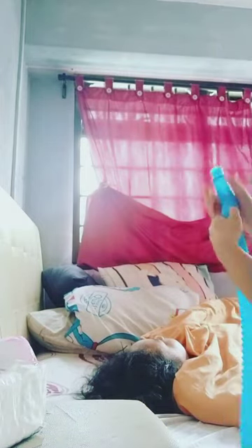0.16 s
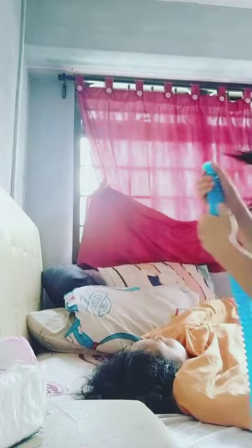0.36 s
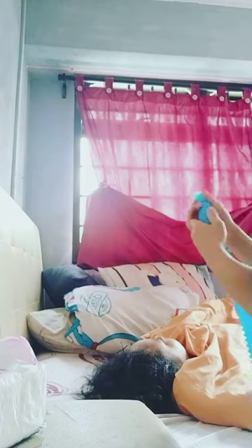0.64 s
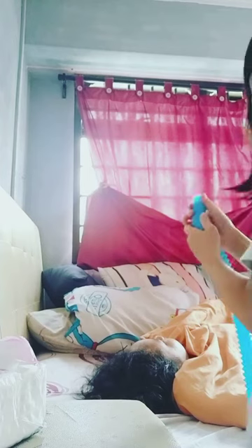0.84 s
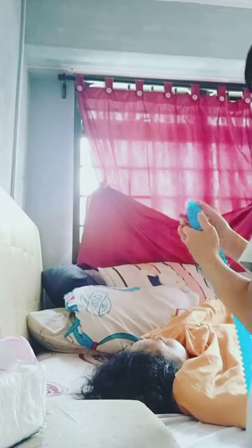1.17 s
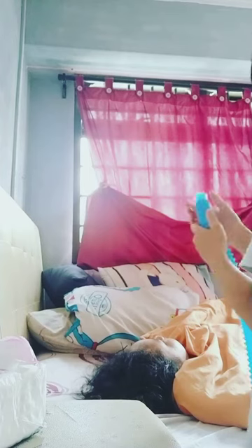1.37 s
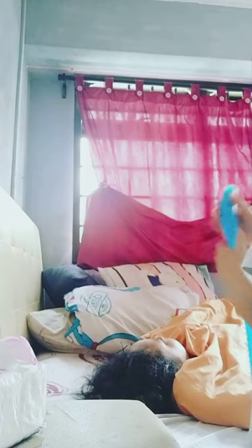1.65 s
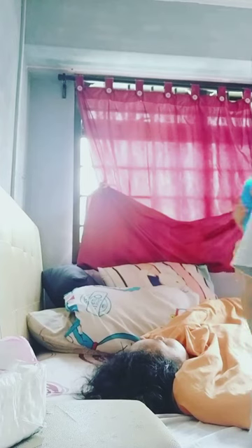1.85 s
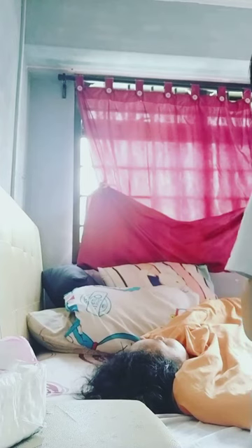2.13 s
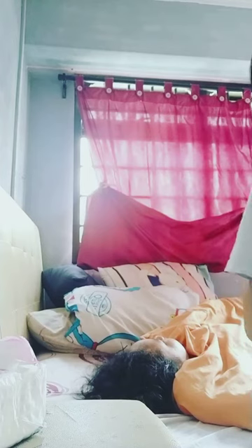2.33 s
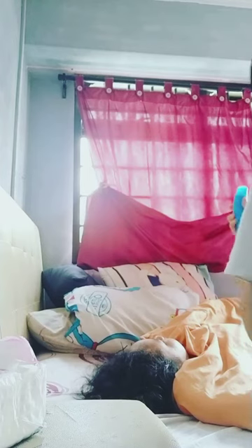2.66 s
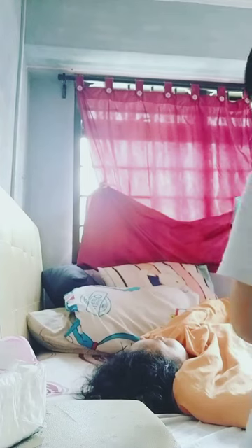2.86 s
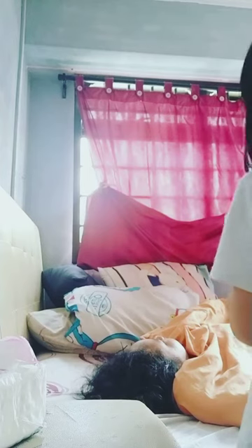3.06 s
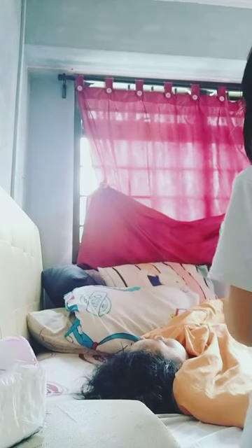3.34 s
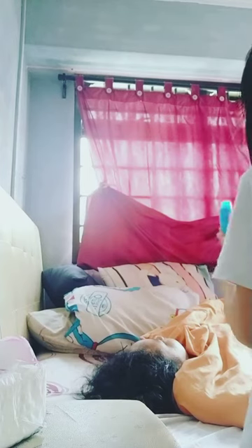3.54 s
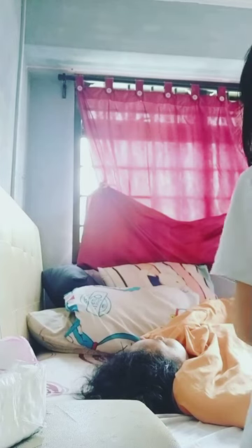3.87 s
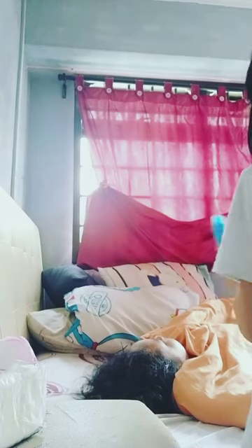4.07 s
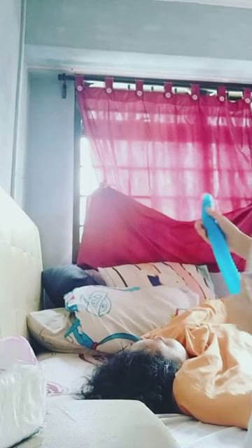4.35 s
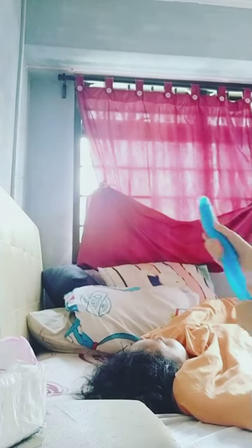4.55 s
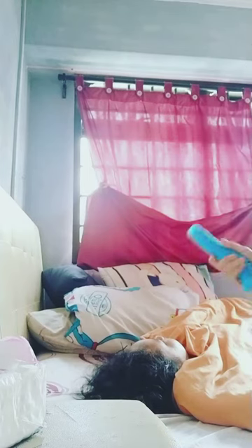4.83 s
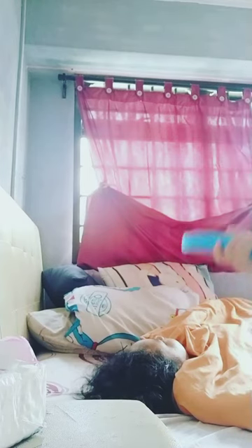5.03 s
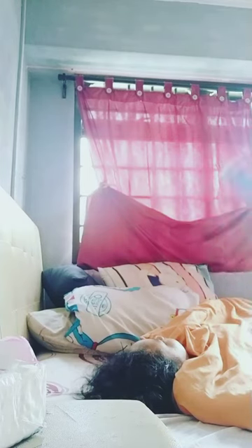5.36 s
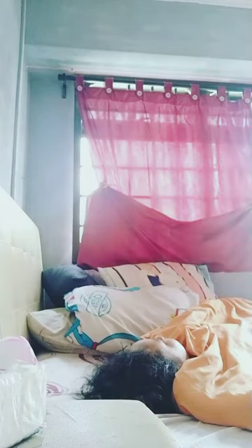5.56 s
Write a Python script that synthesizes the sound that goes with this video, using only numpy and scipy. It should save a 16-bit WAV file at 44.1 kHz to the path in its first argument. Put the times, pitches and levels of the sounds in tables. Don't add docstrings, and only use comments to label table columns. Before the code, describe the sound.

Corrugated plastic pops and crackles in short handfuls, its hollow ring climbing in pitch, with faint finger rubbing between bursts and soft room hush.

```python
import sys
import numpy as np
from scipy import signal
from scipy.fft import rfft, irfft, next_fast_len
from scipy.io import wavfile
from scipy.ndimage import uniform_filter1d

SR = 44100
rng = np.random.default_rng(int(sys.argv[2]) if len(sys.argv) > 2 else 0)


def linear_from_db(decibels):
    return 10 ** (np.asarray(decibels, float) / 20)


def dump(signal):
    limited = np.clip(np.atleast_2d(signal).T, -1, 1)
    pcm = np.round(limited * 32767).astype(np.int16)
    wavfile.write(sys.argv[1], SR, pcm)


N = 251370

# time in seconds, stir level in dB.
STIR = [(0, -64), (.76, -64), (.98, -72), (1.85, -71.5), (2.36, -63.5), (3.92, -61), (4.1, -65), (4.7, -59),
        (5.7, -65)]
# frequency in Hz, density in dB per Hz.
RUMBLE_SPECTRUM = [(12, -60), (20, -32), (41, -10.5), (59, -7), (110, -9.5), (178, -16.5), (250, -31),
                   (320, -78.5), (550, -120)]
TONE_SPECTRUM = [(120, -65.5), (200, -19.5), (307, -15.5), (430, -11), (704, -11.5), (774, -12.5),
                 (880, -8), (1310, -20), (1460, -8), (1890, -21.5), (2860, -19.5), (3810, -58.5),
                 (4190, -29), (8440, -32), (9000, -32.5), (11700, -35), (19800, -120)]
# frequency in Hz, left-right likeness from 0 to 1.
COHERENCE = [(30, .85), (110, 0.8), (290, 0.53), (640, 0.45), (1400, 0), (3000, 0), (9000, 0)]

# middle in seconds, peak in dB, half length in seconds.
SLIDES = [
    (0.188, -71.5, 0.13),
    (1.685, -67, 0.11),
    (2.583, -67, 0.12),
    (3.47, -70, 0.18),
    (4.21, -63.5, 0.03),
    (4.313, -61.5, 0.078),
    (4.456, -65, 0.067),
]
# frequency in Hz, density in dB per Hz.
SKIN_SPECTRUM = [(1180, -35.5), (2000, -18), (3030, -24.5), (3370, -3), (4020, -28.5), (4510, -5.5),
                 (5770, -1.5), (10200, -12.5), (14100, -12.5), (16100, -33), (16500, -86.5)]
# time in seconds, level in dB, frequency in Hz.
TICKS = [
    (0.116, -54, 7600),
    (1.507, -56.5, 3500),
    (4.1989, -50.5, 4460),
    (4.2964, -51, 5940),
]

# start in seconds, then the levels in dB of the
SNAPS_EARLY = [(0.4071, -33.5, -34.5, -21, -30.5), (0.4239, -28, -37.5, -31, -36.5),
               (0.4436, -40.5, -33.5, -22.5, -52), (.578, -8.5, -13.5, -15, -36),
               (.625, -6.5, -18, -19.5, -43.5), (0.6666, -17, -29.5, -27.5, -40),
               (0.763, -15, -29, -33.5, -49.5), (0.8658, -20, -38.5, -29.5, -46),
               (1.9281, -10, -16, -16, -24.5), (2.0622, -14, -31.5, -27, -53),
               (2.0768, -17.5, -33, -21.5, -52), (2.0816, -5.5, -33.5, -44.5, -51),
               (2.1032, -20.5, -26.5, -34, -45.5), (2.1451, -3, -23.5, -26, -39),
               (2.2014, -3, -53.5, -11, -33.5), (2.216, -14, -27, -18.5, -37.5)]
# start in seconds, body, bright, dull and air levels in dB.
SNAPS_MID = [(2.763, -16, -19.5, -13.5, -33.5), (2.773, -10.5, -13, -35.5, -35),
             (2.8854, -15, -42, -25, -26), (2.9167, -4.5, -21.5, -19.5, -52),
             (3.0153, -12.5, -20.5, -64, -56), (3.0796, -1, -42, -23.5, -31.5),
             (3.1114, -6, -45, -17.5, -29.5), (3.5757, -20, -24, -17, -40), (3.5903, -7, -21, -13.5, -18.5),
             (3.6107, -27, -53, -25, -33), (3.732, -25, -37.5, -19, -22.5), (3.7806, -6.5, -17, -18, -30.5),
             (3.8643, -20.5, -34, -35, -38), (3.9257, -8, -30, -19.5, -38), (3.957, -14, -46, -22, -33.5),
             (3.583, -28.5, -24.5, -43, -55.5)]
# start in seconds, body, bright, dull and air levels in dB.
SNAPS_LATE = [(4.584, -11.5, -19, -16.5, -20.5), (4.596, -21.5, -38, -12, -30),
              (4.607, -43, -29.5, -17.5, -20), (4.616, -15.5, -37.5, -6, -15), (4.635, -10, -23, -1, -14.5),
              (4.6303, -49.5, -31.5, -11, -14.5), (4.6893, -71.5, -51, -20, -45),
              (4.7613, -37, -32.5, 0.5, -12.5), (4.8586, -52, -39, -30.5, -25.5),
              (4.8828, -14.5, -31, 4, -8)]
# start in seconds, body, bright, dull and air levels in dB.
SNAPS_LAST = [(5.2569, -22, -37.5, -25.5, -22), (5.2919, -12, -26, -12, -15.5), (5.2993, -2, -19, -23, -24),
              (5.3075, -20, -31, -35, -19), (5.3243, -17, -31, -27.5, -46), (5.342, -12, -29.5, -19, -16),
              (5.3662, -5, -19, -18.5, -24), (5.3917, -18.5, -22.5, -23, -29),
              (5.3958, -5, -22.5, -35, -17.5), (5.435, -23, -24, -22, -22),
              (5.463, -23, -27.5, -28.5, -23.5), (5.5889, -10, -33, -11.5, -13),
              (5.5995, -4.5, -18, -17, -16.5), (5.6197, -20, -38.5, -27, -18),
              (5.6851, -12.5, -52.5, -13.5, -23), (5.6914, -27, -23, -14, -57)]
# start in seconds, body, bright, dull and air levels in dB.
YIELDS = [
    (0.5603, -49.5, -43.5, -36.5, -63.5),
    (1.86, -79.5, -85, -58, -47.5),
    (1.886, -75.5, -75.5, -37.5, -36.5),
    (2.028, -71, -44.5, -57, -37.5),
    (2.758, -37, -49, -31, -20),
    (2.873, -50.5, -79.5, -34, -27),
    (3.54, -95.5, -70, -48, -33.5),
    (2.744, -85, -69, -71, -38),
]
# start in seconds, level in dB, frequency in Hz.
JOLTS = [
    (0.577, -37, 129),
    (.628, -37.5, 121),
    (4.603, -26, 218),
    (4.883, -44.5, 148.5),
    (5.599, -47, 218),
]
# time in seconds, pitch in Hz, t60 of the lowest mode in seconds.
AIR_COLUMN = [(.41, 280, 0.22), (.6, 295, 0.27), (.87, 296, 0.22), (1.93, 307, 0.29), (2.22, 341.2, 0.25),
              (2.77, 352, 0.1), (3.1, 386.6, 0.11), (3.59, 394.4, 0.1), (3.78, 418, 0.074),
              (3.93, 461, .11), (4.59, 451, 0.041), (4.64, 446, 0.052), (4.76, 484.6, 0.07),
              (4.88, 499, .045), (5.27, 526, 0.12), (5.44, 567, 0.056), (5.6, 549, 0.072)]
# time in seconds, strengths in dB of modes 2, 3, 4 and 5.
GRIP_MODES = [(.41, -3, -5.5, 2.5, -11.5), (.7, -18.5, 2.5, 8, 5), (1.93, -2.5, -2, -1.5, -0.5),
              (2.22, -8.5, -7.5, -7.5, -5.5), (2.9, -1.5, -4, 3, 8.5), (3.7, 2.5, -18, 5, 2.5),
              (4.6, 3, -6.5, 8, 1), (4.76, -1, -6.5, 19, 19.5), (4.88, 5.5, -9.5, 18, 17.5),
              (5.3, 14, 5, 9.5, -17), (5.44, 19.5, 19.5, -1, 23.5), (5.6, 6, 3, -6, -3)]
# time in seconds, body click in Hz, bright click in Hz,
# top edge of the bright click in dB.
FACE = [(.44, 2850, 6130, -3.5), (.6, 2740, 4980, -16), (1.93, 2870, 5905, -12.5), (2.1, 3090, 5794, -8.5),
        (2.2, 2880, 5000, -15.5), (2.78, 2420, 6540, -9), (2.92, 3510, 4950, -17.5),
        (3.03, 3830, 5920, -15), (3.11, 3024, 5200, -4.5), (3.58, 3280, 4810, -7.5), (3.8, 3530, 4710, -17),
        (3.93, 2640, 4730, -12), (4.6, 3330, 4810, -5), (4.76, 2450, 6060, -0.5), (5.3, 2240, 6250, -12.5),
        (5.6, 2480, 6150, -7.5)]
# frequency in Hz, width in Hz, level in dB.
DULL_WALL = [(1226, 440, 3.5), (2280, 120, -2)]
# frequency in Hz, gain in dB.
SNAP_COLOUR = [(50, -17.5), (230, -4.5), (8300, -1), (10000, -2), (11300, -3.5), (12600, -5),
               (14000, -13.5), (15500, -11)]

# time in seconds, left-right difference in dB, room share in dB,
# lag of the left port in seconds, height over the bed in metres.
HANDS = [(.42, 6, 1.5, .00011, .21), (.8, 7.5, 0.05, 0.00008, .2), (2.1, 9, 1.9, 0.000085, .27),
         (2.9, 7, 2.5, 0.000031, .26), (3.04, 1, 1, 0.000017, 0.27), (3.6, 4.5, 1, 0.000037, .24),
         (3.95, 3.5, 1, 0.000025, .24), (4.6, 3, -1.5, .00003, .23), (4.76, 3.5, -9, 0.000031, .13),
         (4.88, 5.5, -7.5, 0.000043, .14), (5.4, 5, -5.5, 0.000069, .22), (5.6, 6, -2, 0.000037, .25)]
# left delay in seconds, right delay in seconds, level in dB.
ECHOES = [
    (.0035, .0033, -11),
    (.0086, .0088, -12),
]
# frequency in Hz, t60 in seconds.
REVERBERATION = [(200, 0.095), (530, 0.29), (1400, 0.25), (3700, 0.28), (9700, 0.27)]
# frequency in Hz, room share in dB.
ROOM_COLOUR = [(250, 0), (700, -2), (2000, 2), (4000, -3), (7000, -1.5), (10000, -15.5), (14000, -4)]
# frequency in Hz, left-right difference in dB.
PORTS = [(60, -14), (110, -14.5), (200, -6), (400, -6), (1300, -4), (2400, -0.5), (4400, 0), (8100, -2),
         (15000, 6.5)]


def at(rows, s):
    times, *columns = np.transpose(rows)
    return [np.interp(s, times, column) for column in columns]


def along(points, hz):
    f, v = np.transpose(points)
    return np.interp(np.log(hz + 1), np.log(f + 1), v)


def unit(x):
    return x / np.sqrt(np.mean(x ** 2) + 1e-20)


def filtered(x, response):
    n = x.shape[-1]
    m = next_fast_len(n + 8192)
    spectrum = rfft(x, m) * response(np.fft.rfftfreq(m, 1 / SR))
    return irfft(spectrum, m)[..., :n]


def add(track, s, x):
    part = track[:, round(s * SR):][:, :x.shape[1]]
    part += x[:, :part.shape[1]]


def diffuse(pair, gain):
    def turn(hz):
        return np.arccos(np.clip(along(COHERENCE, hz), -1, 1)) / 2

    mid, side = filtered(pair, lambda hz: gain(hz) * [np.cos(turn(hz)), np.sin(turn(hz))])
    return np.array([mid + side, mid - side])


def hush(spectrum, patchy_db):
    z = signal.stft(rng.standard_normal((2, N + SR)), nperseg=512)[2]
    patches = uniform_filter1d(rng.standard_normal(z.shape[1:]), size=5, axis=0)
    patches = uniform_filter1d(patches, size=10, axis=1)
    pair = signal.istft(z * linear_from_db(patchy_db * unit(patches)), nperseg=512)[1][:, :N]
    return unit(diffuse(pair, lambda hz: linear_from_db(along(spectrum, hz))))


def room_floor():
    stir_db, = at(STIR, np.arange(N) / SR)
    tone_db = -66 + (stir_db + 64)
    rumble = linear_from_db(stir_db - 0.5) * hush(RUMBLE_SPECTRUM, patchy_db=3.0)
    tone = linear_from_db(tone_db + 2.5) * hush(TONE_SPECTRUM, patchy_db=2.0)
    return rumble + tone


def fingers():
    time = np.arange(N) / SR
    edge_drop_db = 18.5
    level = sum(linear_from_db(db - edge_drop_db * ((time - s) / half) ** 2) for s, db, half in SLIDES)
    out = level * hush(SKIN_SPECTRUM, patchy_db=5.0) * linear_from_db(8.0)
    for s, db, hz in TICKS:
        tick = click([(hz, 200, 0), (12500, 800, -12)], time[:2000], burst_s=0.000099)
        add(out, s, placed(linear_from_db(db) * tick, s))
    return out


def resonances(modes):
    def response(f):
        return sum(linear_from_db(db) * 1j * f * w / (c * c - f * f + 1j * f * w) for c, w, db in modes)

    return response


def click(modes, t, burst_s):
    rough = rng.standard_normal(len(t)) * np.exp(-t / burst_s)
    kick = (t == 0) + .26 * rough
    around = filtered(kick, resonances(modes))
    front = filtered(around, resonances(modes))
    around_matched = around * np.linalg.norm(front) / np.linalg.norm(around)
    return np.array([front, around_matched]) / np.abs(front).max()


def placed(x, s):
    front, around = x
    pan_db, wet_db, late, height = at(HANDS, s)
    bed = 2 * height / 343
    bed_echo = (bed, bed + .0001, -6)

    def lag(left, right, f):
        return np.exp(-2j * np.pi * f * np.array([[left + late], [right]]))

    def paths(f):
        echoes = sum(linear_from_db(db) * lag(left, right, f) for left, right, db in [bed_echo] + ECHOES)
        return lag(0, 0, f) + echoes

    wet = linear_from_db(wet_db) * room(around)
    near = filtered(np.pad(front, (0, wet.shape[1] - len(front))), paths)
    return near * linear_from_db([[pan_db / 2], [-pan_db / 2]]) + wet


def room(x):
    hz, t, z = signal.stft(rng.standard_normal((2, SR // 3)), SR, nperseg=256)
    decay = linear_from_db(-60 * t / along(REVERBERATION, hz)[:, None])
    tail = signal.istft(z * decay, SR, nperseg=256)[1]
    wall_s = .0065
    rise = .25 + .75 * np.clip((np.arange(tail.shape[1]) / SR - wall_s) / .002, 0, 1)
    tail = diffuse(rise * tail / np.linalg.norm(tail[0]), lambda f: linear_from_db(along(ROOM_COLOUR, f)))
    return signal.fftconvolve(x[None], tail, axes=1)


def air_column(s, t, body_db, dull_db, air_db):
    pitch, ring_s = at(AIR_COLUMN, s)
    k = np.arange(1, 11)[:, None]
    hz = pitch * k * (1 + .005 * rng.standard_normal(k.shape))
    level_db = along([(1300, dull_db - 9), (2600, body_db - 16.0)], hz)
    level_db = level_db + np.take(at(GRIP_MODES, s), np.clip(k - 2, 0, 3))
    level_db += 1.5 * rng.standard_normal(k.shape)
    level_db -= 8 * np.maximum(k - 5, 0)
    level_db[0] = air_db + 4.0
    flutter = 1.8
    drift = flutter * k * np.cumsum(rng.standard_normal(len(t))) / np.sqrt(SR)
    t60 = ring_s / k ** 0.88
    onset = 1 - np.exp(-t / .0009)
    ring = linear_from_db(level_db - 60 * t / t60) * np.sin(2 * np.pi * hz * t + drift) * onset
    return ring.sum(0)


def snap(s, body_db, bright_db, dull_db, air_db):
    t = np.arange(SR // 4) / SR
    body_hz, bright_hz, edge_db = at(FACE, s)
    body = linear_from_db(body_db - 0.5) * click([(body_hz, 1300, 0)], t, burst_s=0.00012)
    bright_modes = [(bright_hz, 2200, 0), (13000, 5000, edge_db)]
    bright = linear_from_db(bright_db + 13.5) * click(bright_modes, t, burst_s=0.00082)
    dull = linear_from_db(dull_db - 6.5) * click(DULL_WALL, t, burst_s=.00045)
    return body + bright + dull + air_column(s, t, body_db, dull_db, air_db)


def tube():
    out = np.zeros((2, N))
    for s, *levels in SNAPS_EARLY + SNAPS_MID + SNAPS_LATE + SNAPS_LAST + YIELDS:
        add(out, s, placed(snap(s, *levels), s))
    t = np.arange(SR // 10) / SR
    for s, db, hz in JOLTS:
        jolt = linear_from_db(db - 3.0 - 60 * t / 0.087) * np.sin(2 * np.pi * hz * t)
        add(out, s, jolt * np.ones((2, 1)))
    return filtered(out, lambda hz: linear_from_db(along(SNAP_COLOUR, hz)))


def scene():
    return room_floor() + fingers() + tube()


def band_limit(x):
    return signal.sosfilt(signal.butter(12, 16500, fs=SR, output="sos"), x)


def record(dry):
    x = filtered(dry, lambda hz: linear_from_db(along(PORTS, hz) * np.array([[.5], [-.5]])))
    x = x / (1 + np.abs(x / .92) ** 6) ** (1 / 6)
    mix = filtered(x, lambda hz: 1 / (1 + (hz / 15900) ** 60))
    return band_limit(mix)


dry = scene()
out = record(dry)
dump(out)
```